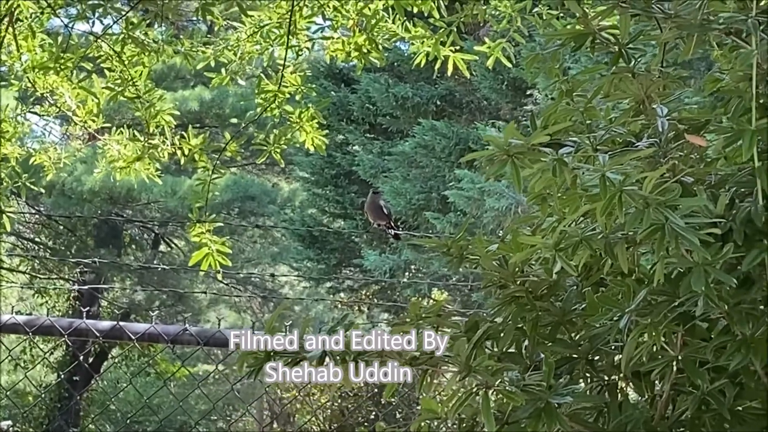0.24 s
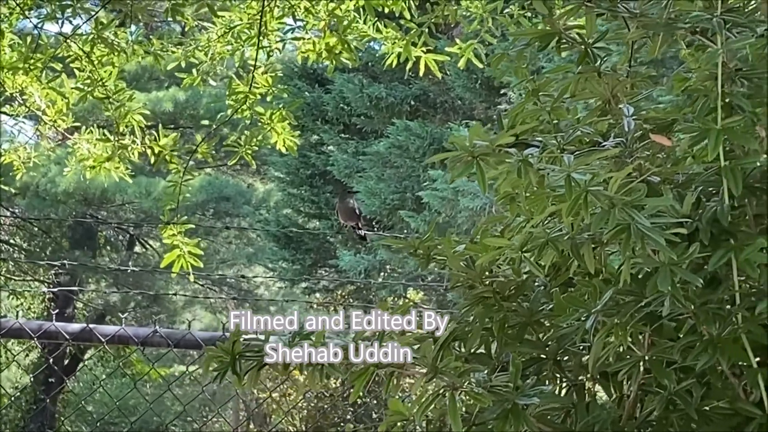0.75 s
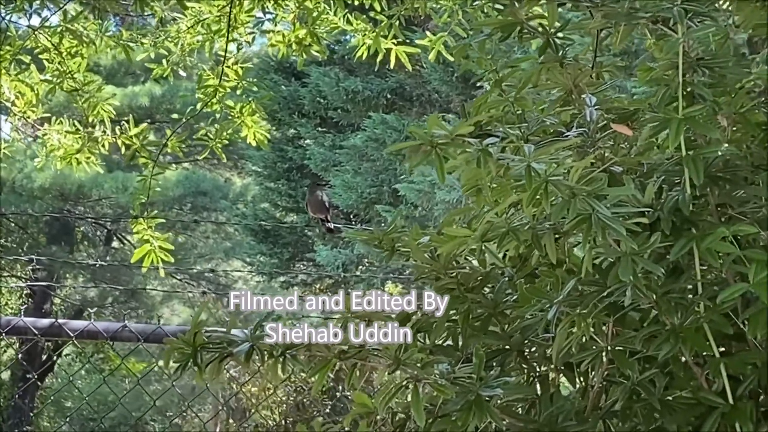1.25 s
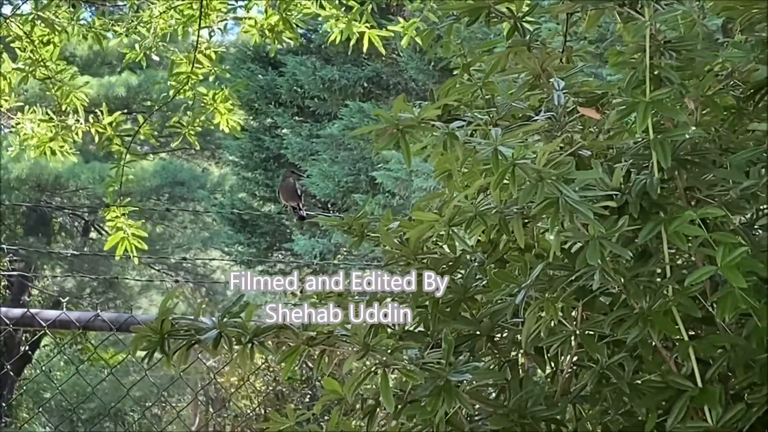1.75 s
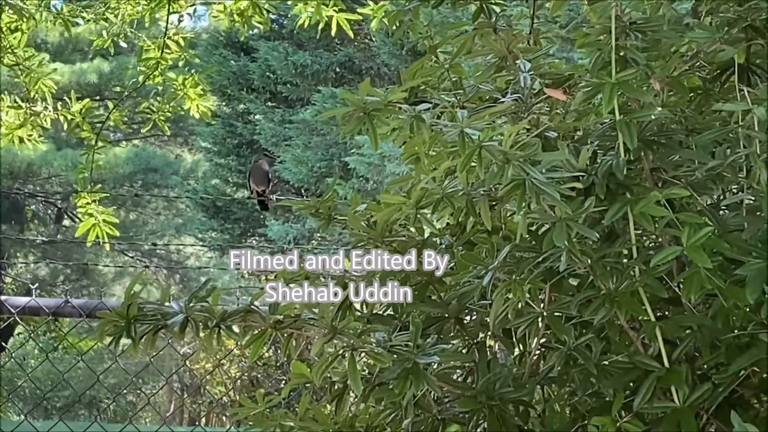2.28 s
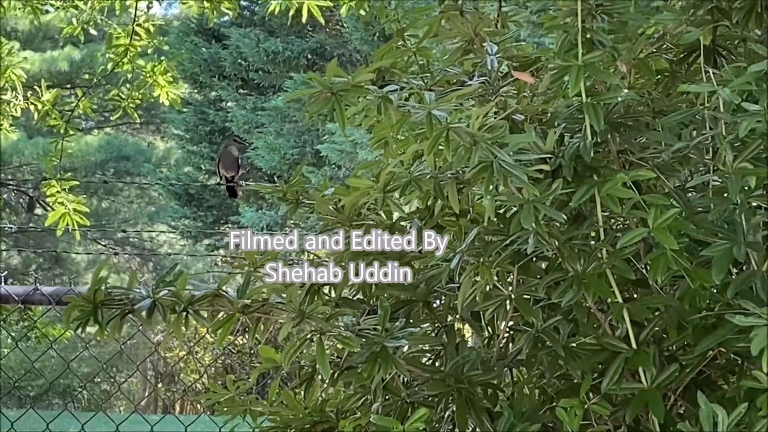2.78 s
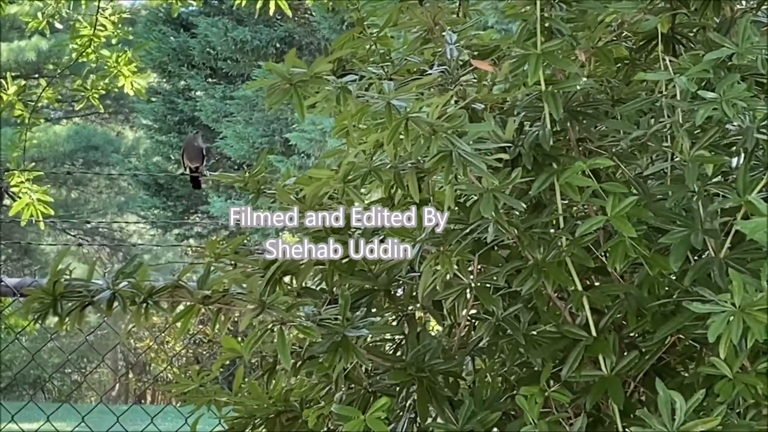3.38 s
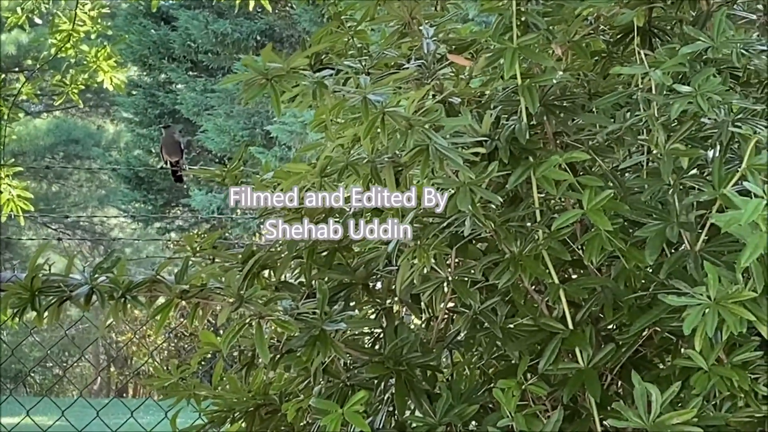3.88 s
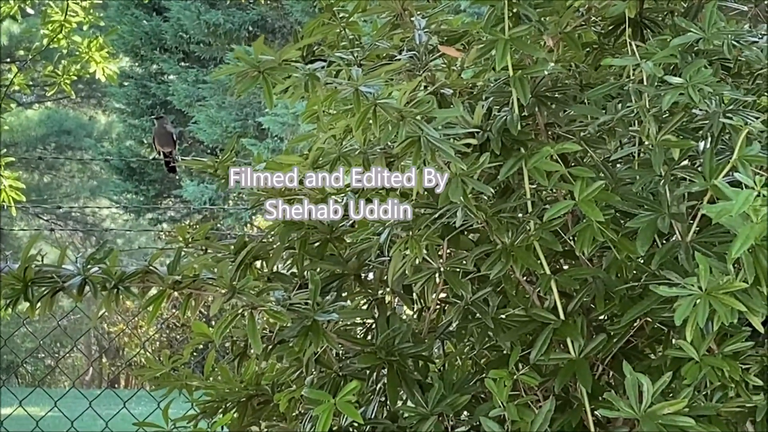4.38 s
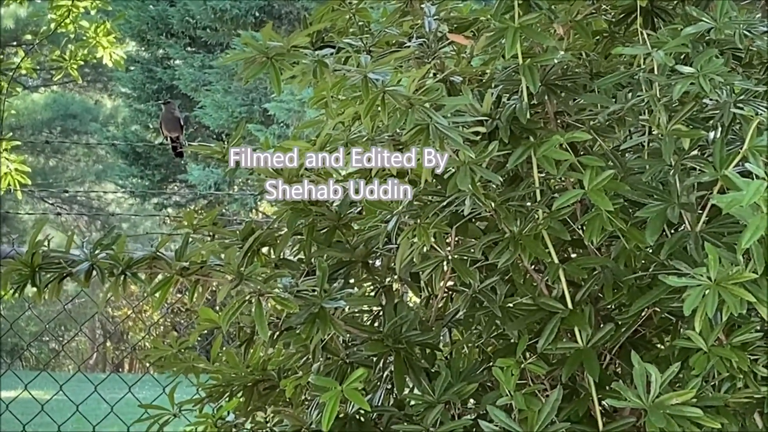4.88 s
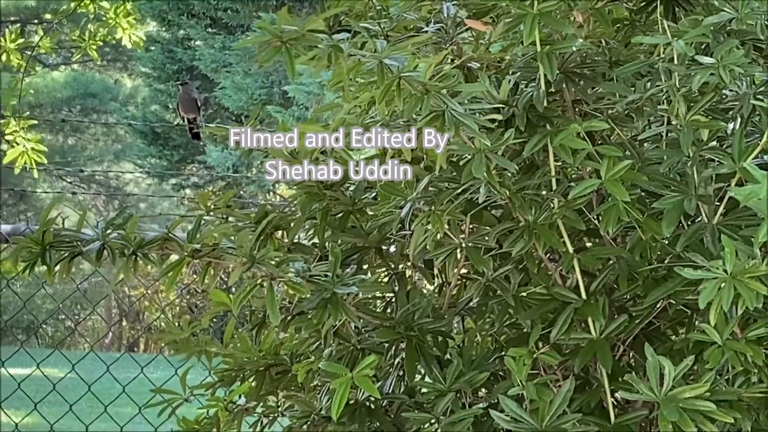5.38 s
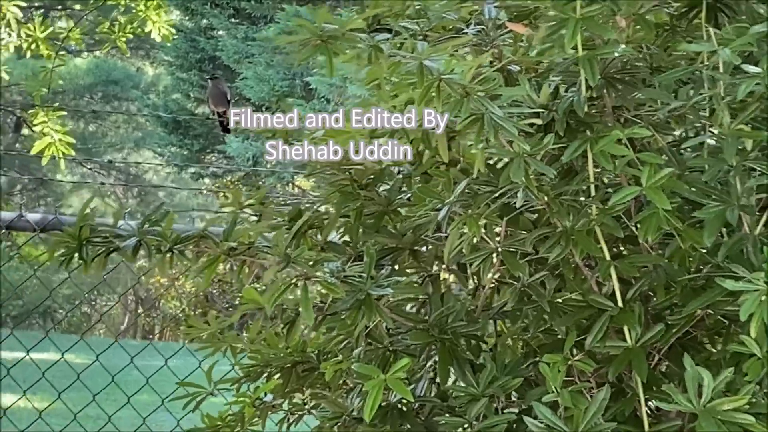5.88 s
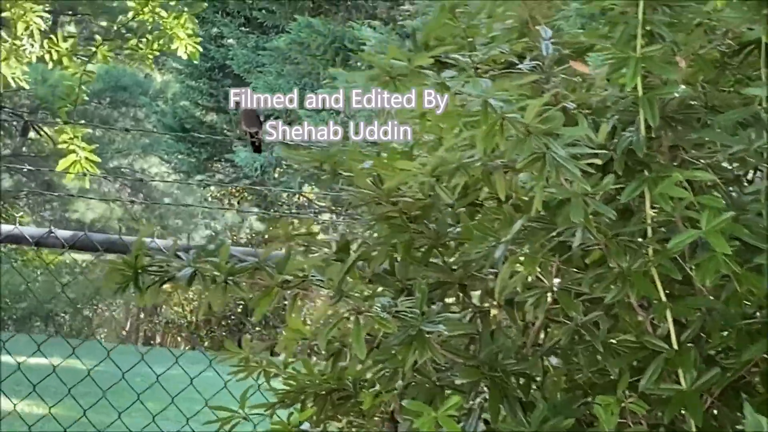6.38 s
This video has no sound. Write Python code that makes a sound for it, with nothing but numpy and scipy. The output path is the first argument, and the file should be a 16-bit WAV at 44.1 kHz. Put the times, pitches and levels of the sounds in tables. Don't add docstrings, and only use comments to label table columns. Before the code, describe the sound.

Varied bird whistles and chattering bursts with short pauses, a distant dog barking, and an engine slowly rising behind soft outdoor rumble.

```python
import sys
import numpy as np
from scipy import signal
from scipy.fft import rfft, irfft
from scipy.io import wavfile
from scipy.ndimage import uniform_filter1d

SR = 44100
rng = np.random.default_rng(int(sys.argv[2]) if len(sys.argv) > 2 else 0)


def invert_db(level):
    return 10 ** (np.asarray(level, dtype=float) / 20)


def to_wav(sig):
    pcm = np.clip(np.atleast_2d(sig), -1, 1) * 32767
    pcm = np.round(pcm).astype(np.int16)
    wavfile.write(sys.argv[1], SR, pcm.T)


N = 292824

# frequency in Hz, density in dB.
AIR_SPECTRUM = [(22, -30.5), (40, -10), (72, 2), (110, -9), (170, -16.5), (300, -23), (500, -28),
                (1100, -28), (2100, -32), (2800, -39), (4200, -42), (5500, -54.5), (8000, -57.5),
                (10000, -52), (16000, -80)]
AIR_DB = -59
# time in seconds, level in dB.
RUMBLE_SWELL = [(0.0, -63.5), (0.94, -61), (2.27, -62), (4.6, -59.5), (6.47, -60), (6.64, -55.5)]
# time in seconds, level in dB.
RUSTLE_SWELL = [(0, -78), (.3, -87.5), (.55, -94.5), (.65, -79), (1.2, -88), (1.9, -84.5), (2.8, -86.5),
                (3.05, -78.5), (3.2, -84), (3.4, -84.5), (4.9, -83), (5.1, -77), (5.7, -90), (6.64, -84)]
# frequency in Hz, correlation from -1 to 1.
PORT_LIKENESS = [(60, 0.97), (130, 0.94), (290, 0.59), (640, 0.076), (1400, 0.17), (2300, 0.93), (4400, 1),
                 (7000, 0.9), (15000, 0.85)]
# time in seconds, firing rate in Hz, level in dB, third order in dB.
ENGINE_GLIDE = [(3.5, 79.03, -74.5, -89), (6.42, 116.4, -64, -74), (6.64, 102.9, -59, -69)]
# first throb in seconds, throbs per second, pitch in Hz, bandwidth in Hz, level in dB.
INSECT = (-0.8, 5.5, 10418, 269.5, -99)

# start in seconds, length in seconds, pitch in Hz, first level in dB, last in dB.
FAR_BIRDS = [(.228, 0.055, 7500, -83, -82.5), (2.608, 0.038, 8370, -74.5, -76),
             (6.457, 0.064, 4600, -81, -79.5), (6.528, 0.056, 3900, -74, -76),
             (4.76, 0.045, 6100, -78, -80), (.004, .065, 4800, -87, -87)]
# start in seconds, length in seconds, pitch in Hz, first level in dB, last in dB.
FAR_DOG = [
    (2.536, 0.088, 574, -73, -73),
    (2.682, .2, 603, -74.5, -70.5),
    (2.931, 0.19, 588, -73, -68.5),
]
# time in seconds, pitch in Hz, level in dB.
FAR_WHISTLE = [(5.12, 1312, -82), (5.18, 1432, -74), (5.23, 1567, -75), (5.31, 1344, -81),
               (5.37, 1450, -78), (5.425, 1400, -82), (5.5, 1557, -78), (5.6, 1493, -79), (5.72, 1540, -91)]
# time in seconds, pitch in Hz, level in dB.
FAR_BUZZ = [(2.865, 2650, -76), (2.9, 2820, -72), (2.94, 2920, -67), (2.955, 2770, -78)]
# time in seconds, pitch in Hz, level in dB.
LINGER = [(.01, 2600, -60), (.1, 2670, -80), (.34, 2613, -87.5)]

# time in seconds, pitch in Hz, first partial in dB,
# and second partial in dB where it moves on its own.
FIRST_VERSE = [
    [(0.0, 2600, -35), (0.006, 2570, -45), (0.013, 2550, -61)],
    [(0.045, 1677, -67, -83), (0.065, 1867, -42.5, -83), (0.088, 1820, -43.5, -89), (0.1, 1703, -54.5, -87),
     (0.17, 1638, -56, -87), (0.222, 1607, -57.5, -70)],
    [(0.68, 8700, -66), (0.7, 7520, -46), (0.71, 6140, -45.5), (0.72, 6530, -41.5), (0.735, 7730, -50),
     (0.752, 8170, -49.5)],
    [(0.755, 8100, -45), (0.77, 5670, -36), (0.785, 4754, -42.5), (0.797, 4740, -80)],
    [(1.35, 7830, -64, -99), (1.358, 5590, -58.5, -97), (1.367, 4520, -41, -68), (1.42, 4100, -54, -65),
     (1.44, 4470, -45, -53), (1.449, 4950, -39, -82), (1.458, 7300, -51.5, -66), (1.468, 7780, -49.5, -67),
     (1.49, 8000, -74, -90)],
    [(1.56, 3040, -53), (1.568, 3110, -48), (1.577, 2684, -40), (1.585, 1530, -54)],
    [(2.8, 2280, -47.5), (2.81, 2580, -39.5), (2.824, 2410, -44.5), (2.833, 2630, -39.5),
     (2.843, 2250, -44), (2.85, 2470, -44), (2.856, 1750, -53)],
]
SECOND_VERSE = [
    [(4.38, 3300, -82), (4.39, 2464, -52.5), (4.405, 1980, -50), (4.44, 1913, -52.5), (4.452, 2120, -61)],
    [(5.244, 9540, -62), (5.255, 8500, -45), (5.27, 8080, -42.5), (5.281, 8350, -47), (5.288, 8580, -43),
     (5.295, 6520, -40), (5.301, 8600, -54)],
    [(5.37, 4000, -76), (5.38, 4500, -60), (5.392, 3560, -50), (5.405, 3420, -47.5), (5.412, 4256, -45.5),
     (5.44, 4430, -60), (5.47, 4350, -67)],
    [(5.474, 4740, -48), (5.484, 6680, -44.5), (5.49, 5570, -38.5), (5.52, 5120, -41), (5.542, 5210, -43),
     (5.558, 7980, -46), (5.572, 7400, -53), (5.585, 8100, -41.5), (5.625, 7690, -69.5)],
    [(6.066, 2070, -70, -82), (6.08, 2470, -59, -52), (6.09, 3000, -52, -32.5), (6.105, 3396, -56.5, -30),
     (6.125, 3258, -52, -42), (6.16, 3150, -44, -54.5), (6.172, 3180, -45, -56), (6.18, 3130, -67, -64)],
]
# second, third and fourth partial in dB against the first, rasp 0-1.
VOICE = [(-23, -34, -29, 0.4), (-2, -29.5, -45, 0.1), (-37, -55, -55, 0.18), (-33, -37.5, -55, 0.8),
         (6, -27, -55, 0.13), (-28, -34, -59, 0.2), (-39, -49, -41, 0.02), (-32, -30, -45, 0.09),
         (-23, -55, -55, 0), (-12, -32, -25, 0.08), (-22.5, -28, -55, 0.05), (-7.5, -23, -25, 0.41)]
# first pitch crest in seconds, end in seconds, beats per second,
# pitch swing 0-1, loudness swing in dB.
TRILLS = [(.6887, .734, 215, .045, 3.5), (1.2505, 1.325, 80, .125, 8), (2.8595, 2.962, 81.4, .09, 10),
          (5.828, 5.868, 91, .14, -1.5)]
TRILL_LAG = .3
TROUGH_LAG, TROUGH_SHARE = .42, .55
# time in seconds, pitch in Hz, fifth partial in dB, third partial in dB.
MEW = [(4.575, 900, -66, -73), (4.605, 990, -67.5, -71), (4.635, 1010, -76, -74), (4.68, 1021, -82, -72),
       (4.72, 996, -70, -78), (4.77, 880, -71, -81)]
# multiple of the pitch, level in dB against the third.
MEW_PARTIALS = [(2, 1), (3, 4), (4, -6), (6, -9.5), (7, -24), (8, -20), (10, -31)]
# frequency in Hz, level in dB.
BREATH = [(1500, -19.5), (4000, -1.5), (8000, -3), (11500, -9), (13500, 1.5), (15800, -9.5)]

# attack and release in seconds; pitch ratio at entry, middle, last
# and exit; level in dB at entry, middle and exit.
WHISTLE = (0.0058, 0.0088), (.94, 0.98, .98, 0.873), (-15, -0.64, -15)
PIPE = (0.013, 0.012), (.95, 1.01, 0.965, 0.88), (-15.5, 0.97, -31)
DIP = (.012, 0.007), (1.4, .845, .905, 0.51), (-1.5, 3.1, -26)
TICK = (0.0044, 0.0044), (1.09, 1.025, 1.05, 1.09), (-5.5, 0, -14)
RISE = (.03, .022), (.82, 1.1, 1.2, 1.01), (-34.5, 0, -20)
FLICK = (0.022, 0.0117), (1.01, 1.09, 1.172, 0.906), (-25, 0, -8)
LEAD_IN = (0.021, 0.0066), (1.02, .98, .96, .99), (-12, 0, 6.5)
FALL = (0.0055, 0.013), (1.03, .93, .87, .92), (-8, 0, -17.5)
ROLL = (0.0126, 0.0124), (1.04, .97, .94, 0.69), (-8, 0.63, -28)
FAR_CHIP = (.021, .021), (.88, 1.03, .995, .93), (-3, 0, -12.5)
BARK = (0.015, 0.0334), (0.992, 1.005, 1.002, 0.52), (-2, 0, -21.5)
# gesture, voice as in VOICE, then its syllables, each with start in
# seconds, length in seconds, pitch in Hz, first level in dB, last level in dB.
PLAIN_SYLLABLES = [ (WHISTLE, (-43, -36.5, -35.5, 0), [ (5.943, 0.064, 2217, -39.5, -41)]),
                   (WHISTLE, (-40, -29, -41, 0.24), [(4.559, 0.037, 2110, -41, -46)]),
                   (PIPE, (-14, -33, -36, 0.04), [(3.527, 0.056, 2948, -44.5, -45.5),
                   (3.82, 0.059, 2946, -40.5, -49)]), (TICK, (-27, -39, -27, 0.15),
                   [(2.19, 0.038, 3078, -46.5, -46.5), (2.44, 0.035, 3088, -43.5, -52)]),
                   (FALL, (-33.5, -40.5, -35.5, 0.2), [(4.521, 0.035, 3220, -50, -40.5),
                   (5.902, 0.027, 2030, -38.5, -43)]), (LEAD_IN, (-0.5, -12, -54, 0.5),
                   [(3.49, 0.041, 4150, -67.5, -62), (3.775, 0.058, 4430, -67, -66)]),
                   (TICK, (-34, -41, -49, 0), [(2.723, 0.023, 1920, -65.5, -65),
                   (2.782, .014, 2350, -70, -59)]), ]
BENT_SYLLABLES = [ (RISE, (-40, -33, -55, 0.58), [(2.092, 0.063, 5030, -48, -41),
                  (2.336, .066, 5154, -44.5, -42)]), (FLICK, (-20, -35, -50, -0.2),
                  [(1.543, 0.037, 3960, -49, -56)]), (FLICK, (-25, -41, -56, 0.46),
                  [(4.46, 0.062, 2218, -53, -42)]), (DIP, (-18, -28, -41.5, 0.46),
                  [(2.132, 0.048, 2934, -53.5, -46)]), (FALL, (-29, -29.5, -52, 0.85),
                  [(.753, 0.043, 2605, -51.5, -57.5)]), (ROLL, (-27, -29, -54, 0.38),
                  [(2.852, 0.11, 2025, -63, -54)]), ]
CLEAR, RASPY = .1, .33
# voice as in VOICE, then its note with time in seconds, pitch in Hz,
# first partial in dB, and second partial in dB where it moves on its own.
RATTLES = [ ((0, -23.5, -33, CLEAR), [(1.184, 1766, -67, -92), (1.196, 1708, -60.5, -84),
           (1.222, 1634, -52.5, -73), (1.236, 1568, -55.5, -63), (1.243, 1520, -62, -64)]),
           ((0, -20, -24, RASPY), [(1.238, 1540, -70, -63), (1.245, 1522, -57, -60),
           (1.255, 1493, -61, -57.5), (1.28, 1461, -62, -48.5), (1.305, 1470, -69, -50.5),
           (1.317, 1580, -66, -63), (1.33, 1500, -74, -72)]), ((-14, -18, -30, 2), [(1.3, 1900, -63),
           (1.314, 2020, -61), (1.32, 2080, -60), (1.33, 3300, -64)]), ((-35, -42, -40.5, CLEAR),
           [(5.793, 2920, -73.5), (5.802, 2440, -58), (5.812, 2510, -44.5), (5.818, 2900, -43),
           (5.823, 2854, -43), (5.845, 2758, -39.5), (5.864, 2640, -44), (5.869, 2170, -45),
           (5.877, 2020, -62)]), ((-24, -25.5, -40, CLEAR), [(2.952, 1940, -56), (2.958, 1900, -45),
           (2.97, 1867, -44), (2.985, 1840, -46.5), (3.002, 1830, -62)]), ((-33, -32, -50, CLEAR),
           [(2.738, 1745, -59), (2.748, 1836, -50), (2.763, 1870, -48.5), (2.775, 1790, -50),
           (2.782, 1690, -59)]), ]
HARSH_NOTES = [ ((-37, -42, -29.5, 0.16), [(6.166, 3120, -57), (6.176, 3163, -45), (6.187, 3158, -35),
               (6.197, 3124, -42.5), (6.212, 3153, -37), (6.223, 3114, -42), (6.233, 3100, -60)]),
               ((-17, -27.5, -34, 0.3), [(2.364, 3590, -68), (2.38, 3560, -58.5), (2.392, 3060, -49.5),
               (2.404, 2627, -47), (2.42, 2795, -43.5), (2.429, 2370, -66)]), ((0.5, -27.5, -23, 0.14),
               [(3.136, 1127, -73, -73.5), (3.145, 1234, -67, -64), (3.16, 1304, -58.5, -57),
               (3.175, 1308, -59, -54.5), (3.192, 1240, -64, -46), (3.205, 1135, -71, -53.5),
               (3.216, 1090, -80, -75)]), ((-0.5, -17, -8, 0.37), [(3.603, 2530, -66.5, -68),
               (3.611, 3110, -60.5, -52), (3.621, 3536, -46.5, -45), (3.633, 3484, -53, -46.5),
               (3.647, 3340, -52, -49), (3.663, 2950, -56, -51), (3.676, 2910, -64.5, -64)]),
               ((-23, -9.5, -40, 0.4), [(3.969, 3760, -74), (3.976, 3730, -61.5), (3.986, 4050, -60),
               (3.996, 3955, -53.5), (4.008, 3800, -50.5), (4.026, 3390, -59), (4.045, 3350, -71)]),
               ((-21, -60, -60, 0.04), [(3.95, 7000, -83), (3.966, 6960, -60.5), (3.972, 6750, -48),
               (3.982, 7100, -41.5), (4.002, 7610, -43), (4.012, 7330, -50), (4.024, 6780, -41.5),
               (4.036, 6260, -47), (4.05, 6130, -56)]), ]

# frequency in Hz, time to fall 60 dB in seconds.
ECHO_DECAY = [(1000, 0.32), (2200, 0.3), (3100, 0.83), (6000, 0.53), (9000, 0.61), (16000, 0.19)]
# frequency in Hz, level in dB.
ECHO_COLOUR = [(1500, -7), (2400, -8), (3200, -0.5), (5000, 1.5), (8000, -2.5), (15000, 6)]
# frequency in Hz, difference in dB.
SHADE = [(1300, -3.5), (1620, 6), (1900, 1.5), (2300, 1.5), (3100, -1.2), (4400, 1.1)]
# frequency in Hz, lead in radians.
PORT_LEAD = [(1800, 0), (2600, 0.15), (3100, 0.56), (4400, 0.08), (6000, 0.1), (7800, 0.9), (8300, -2),
             (8900, -3), (10400, -6), (12900, -8.5), (15000, -12), (16500, -11.5)]
EDGE_HZ = 15900


def evened(x):
    return x / np.sqrt(np.mean(abs(x) ** 2) + 1e-20)


def read(points, hz):
    f, value = np.transpose(points)
    return np.interp(np.log(hz + 1), np.log(f + 1), value)


def add(mix, s, sound):
    part = mix[round(s * SR):][:len(sound)]
    part += sound[:len(part)]


def unroll(rows):
    s, *columns = np.transpose(rows)
    t = np.arange(s[0], s[-1], 1 / SR)
    return t, [np.interp(t, s, c) for c in columns]


def wobble(size, width_hz):
    z = rng.standard_normal(size + 500) + 1j * rng.standard_normal(size + 500)
    r = np.exp(-np.pi * width_hz / SR)
    once = signal.lfilter([1], [1, -r], z)
    twice = signal.lfilter([1], [1, -r], once)
    return evened(twice[500:])


def tone(hz, partials, rasp, width_hz, edge_s=.0025):
    rasp = np.clip(rasp, 0, 1)
    shake = np.sqrt(1 - rasp) + np.sqrt(rasp) * wobble(len(hz), width_hz)
    turns = np.cumsum(hz) / SR + np.unwrap(np.angle(shake)) / (2 * np.pi)
    flutter = 0.49 * wobble(len(hz), width_hz=660).real
    out = np.zeros(len(hz))
    for k, db in partials:
        smear = (k > 1) * np.clip((k * hz - 7000) / 4000, 0, 1) * flutter
        out += invert_db(db) * (k * hz < EDGE_HZ) * np.cos(2 * np.pi * k * turns + smear)
    edge = signal.windows.tukey(len(hz), min(2 * edge_s * SR / len(hz), 1))
    return np.sqrt(2) * out * abs(shake) * edge


def gesture(shape, start, length, hz, first_db, last_db):
    (attack, release), (entry, middle, last, leave), (entry_db, middle_db, exit_db) = shape
    held = start + attack
    let_go = start + max(length - release, attack + 0.00088)
    return [(start, entry * hz, first_db + entry_db),
            (held, hz, first_db),
            ((held + let_go) / 2, middle * hz, (first_db + last_db) / 2 + middle_db),
            (let_go, last * hz, last_db),
            (let_go + release, leave * last * hz, last_db + exit_db)]


def air():
    frames, hz = N // 512 + 5, np.fft.rfftfreq(2048, 1 / SR)
    a, b, c, d, patches = rng.standard_normal((frames, 1025, 5)).T
    patches = uniform_filter1d(patches, size=20, axis=0)
    patches = evened(uniform_filter1d(patches, size=8, axis=1))
    t = np.arange(frames) * 512 / SR
    rumble_db = np.interp(t, *np.transpose(RUMBLE_SWELL))
    rustle_db = np.interp(t, *np.transpose(RUSTLE_SWELL))
    low = 1 / (1 + (hz / 150) ** 4)
    high = 1 / (1 + (3000 / (hz + 1)) ** 4)
    swell_db = np.outer(low, rumble_db - rumble_db.mean())
    swell_db += np.outer(high, rustle_db - np.median(rustle_db))
    same = np.clip(read(PORT_LIKENESS, hz), -1, 1)[:, None]
    left = a + 1j * b
    right = same * left + np.sqrt(1 - same ** 2) * (c + 1j * d)
    z = np.array([left, right]) * invert_db(read(AIR_SPECTRUM, hz)[:, None] + 1.4 * patches + swell_db)
    return invert_db(AIR_DB) * evened(signal.istft(z, nperseg=2048, noverlap=1536)[1][:, :N])


def engine():
    t, (hz, db, third_db) = unroll(ENGINE_GLIDE)
    out = np.zeros(N)
    partials = [(1, db + 0.5), (3, third_db - 7.0)]
    add(out, t[0], tone(hz, partials, 0.26, width_hz=2.9, edge_s=0.029))
    return out


def insect():
    start, rate, hz, width_hz, db = INSECT
    t = np.arange(N) / SR
    throb = np.exp(4.6 * (np.cos(2 * np.pi * rate * (t - start)) - 1))
    carrier = (wobble(N, width_hz) * np.exp(2j * np.pi * hz * t)).real
    return invert_db(db) * evened(throb * carrier)


def far_voices():
    out = np.zeros(N)
    chips = [gesture(FAR_CHIP, *row) for row in FAR_BIRDS]
    barks = [gesture(BARK, *row) for row in FAR_DOG]
    # (notes, rasp 0-1, blur Hz)
    groups = [(chips, .5, 450), ([FAR_BUZZ], .9, 500), ([FAR_WHISTLE], .12, 50),
              (barks, .95, 330), ([LINGER], .6, 40)]
    for tables, rasp, width_hz in groups:
        for rows in tables:
            t, (hz, db) = unroll(rows)
            add(out, t[0], tone(hz, [(1, db)], rasp, width_hz, edge_s=0.0089))
    return out


def garden(x, unlike=0.082):
    taps = np.zeros((2, SR))
    at = np.arange(120, SR - 20, 20) + rng.integers(0, 20, (2, (SR - 121) // 20))
    np.put_along_axis(taps, at, rng.choice([-1., 1.], at.shape), axis=1)
    hz, t, z = signal.stft(taps, SR, nperseg=256)
    walls = invert_db(-60 * t / read(ECHO_DECAY, hz)[:, None])
    leaves = 8.7 * invert_db(-60 * t / 0.11)
    z *= (walls + leaves) * invert_db(read(ECHO_COLOUR, hz)[:, None])
    mid, side = signal.istft(z, SR, nperseg=256)[1]
    tail = np.array([mid + unlike * side, mid - unlike * side]) / np.linalg.norm(mid)
    return signal.oaconvolve(x[None], tail, axes=1)[:, :N]


def note(rows, second_db, third_db, fourth_db, rasp):
    t, (hz, first_db, *own) = unroll(rows)
    hz = uniform_filter1d(hz, size=90)
    for start, end, rate, depth, loud_db in TRILLS:
        beat = (t - start) * rate
        on = np.clip(2 * np.minimum(beat + 1, (end - t) * rate) - .5, 0, 1)
        hz = hz * (1 + on * depth * np.cos(2 * np.pi * beat))
        lag = 0 if own else TRILL_LAG
        first_db = first_db + on * loud_db * np.cos(2 * np.pi * (beat - lag))
        trough_db = TROUGH_SHARE * on * loud_db * np.cos(2 * np.pi * (beat - TROUGH_LAG))
        own = [db + trough_db for db in own]
    upper_db = np.maximum(first_db, own[0] - 6) if own else first_db
    base_db = own[0] if own else first_db
    partials = [(1, first_db), (2, base_db + second_db), (3, upper_db + third_db),
                (4, upper_db + fourth_db), (5, upper_db + fourth_db - 5)]
    voice = tone(hz, partials, rasp ** 2, width_hz=400)
    effort = np.sqrt(abs(uniform_filter1d((voice * hz / 4000) ** 2, size=200, mode="constant")))
    return voice, effort * (0.026 + abs(rasp))


def mew():
    t, (hz, fifth_db, third_db) = unroll(MEW)
    partials = [(5, fifth_db)] + [(k, third_db + db) for k, db in MEW_PARTIALS]
    hz = uniform_filter1d(hz, size=600)
    return t[0], tone(hz, partials, 0.011, width_hz=130, edge_s=0.0046)


def breath():
    hz, t, z = signal.stft(rng.standard_normal(N), SR, nperseg=256)
    gape = uniform_filter1d(rng.standard_normal(z.shape), size=6, axis=0)
    gape = uniform_filter1d(gape, size=14, axis=1)
    z *= invert_db(read(BREATH, hz)[:, None] + 5.0 * evened(gape))
    return evened(signal.istft(z, SR, nperseg=256)[1][:N])


def songbird():
    out, leak = np.zeros((2, N))
    notes = list(zip(FIRST_VERSE + SECOND_VERSE, VOICE))
    for shape, voice, syllables in PLAIN_SYLLABLES + BENT_SYLLABLES:
        notes += [(gesture(shape, *row), voice) for row in syllables]
    notes += [(rows, voice) for voice, rows in RATTLES + HARSH_NOTES]
    for rows, voice in notes:
        sound, effort = note(rows, *voice)
        add(out, rows[0][0], sound)
        add(leak, rows[0][0], effort)
    add(out, *mew())
    return out + invert_db(-12.5) * leak * breath()


def scene():
    bird, far = songbird(), far_voices()
    near = invert_db(-0.5) * bird + garden(invert_db(-4.5) * bird + invert_db(3.5) * far)
    shade = invert_db(np.outer([.5, -.5], read(SHADE, np.fft.rfftfreq(N, 1 / SR))))
    return irfft(rfft(near) * shade, N) + 0.97 * far + engine() + insect() + air()


def top_cut(x):
    return signal.sosfilt(signal.butter(12, 16580, fs=SR, output="sos"), x)


def record(dry):
    hz = np.fft.rfftfreq(N, 1 / SR)
    turn = np.exp(.5j * np.outer([1, -1], read(PORT_LEAD, hz)))
    bass_cut = 1 / (1 + (30 / (hz + 1)) ** 4)
    treble_cut = 1 / (1 + (hz / EDGE_HZ) ** 200)
    return top_cut(irfft(rfft(dry) * turn * bass_cut * treble_cut, N))


dry = scene()
out = record(dry)
to_wav(out)
```